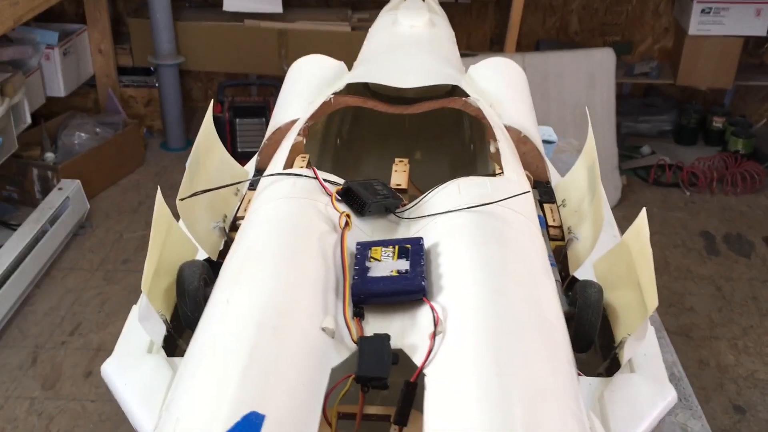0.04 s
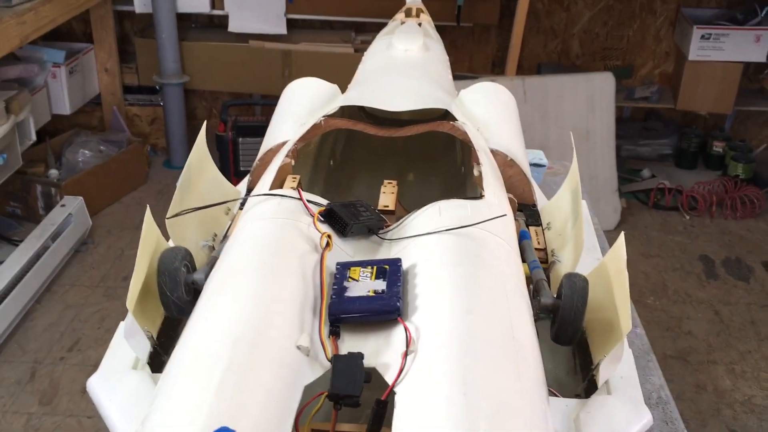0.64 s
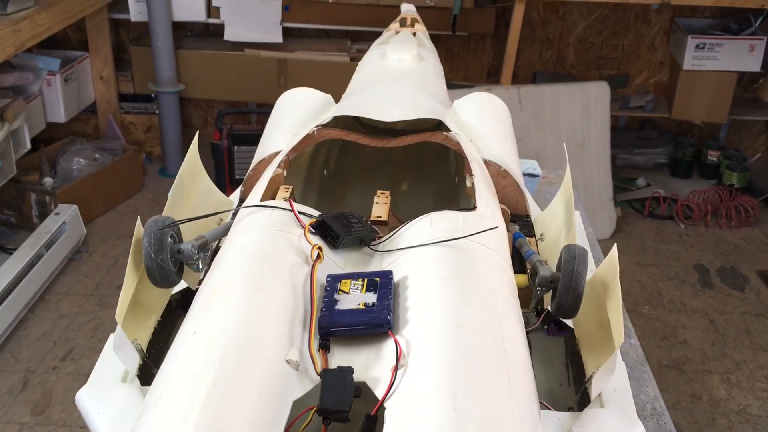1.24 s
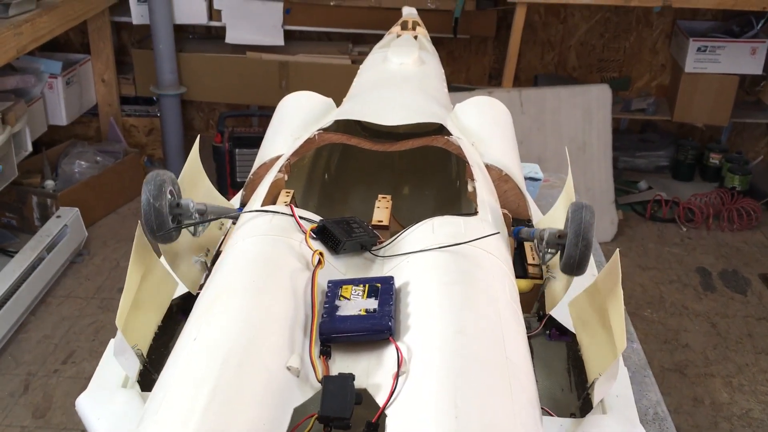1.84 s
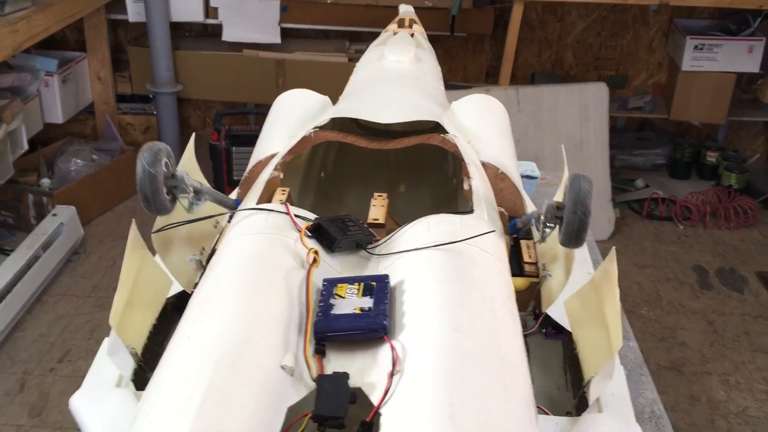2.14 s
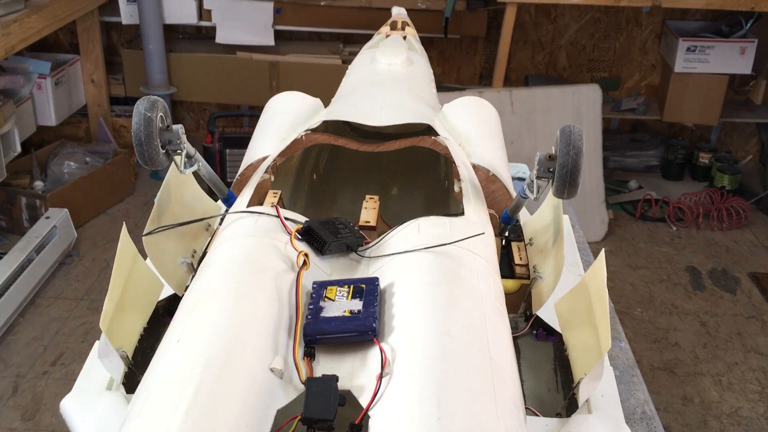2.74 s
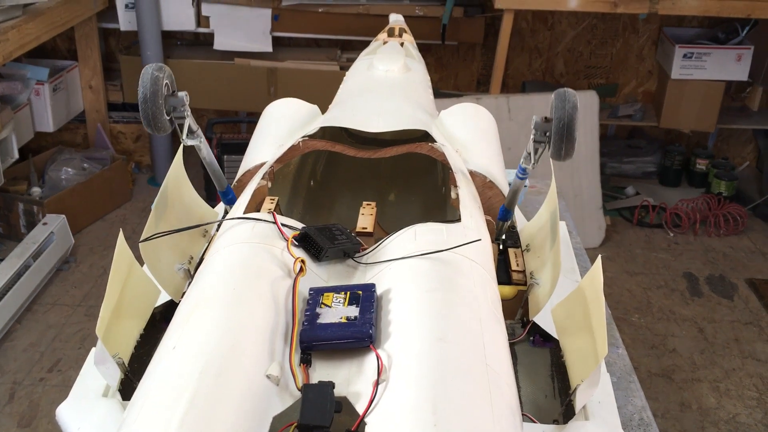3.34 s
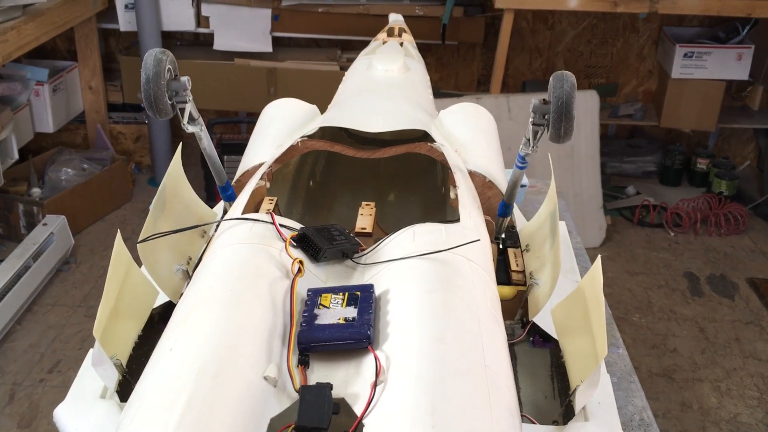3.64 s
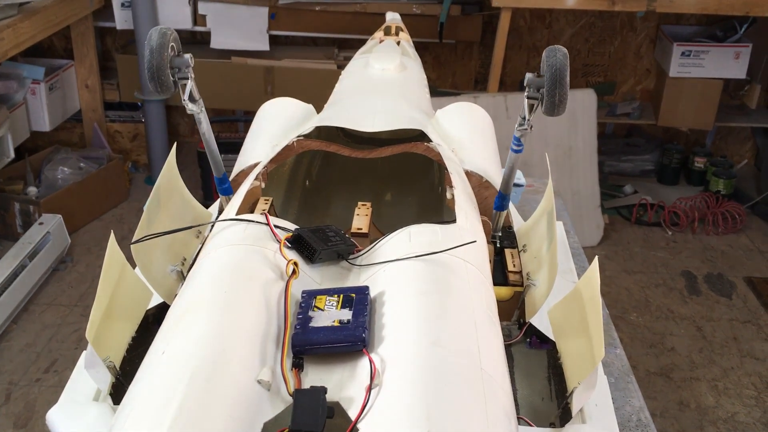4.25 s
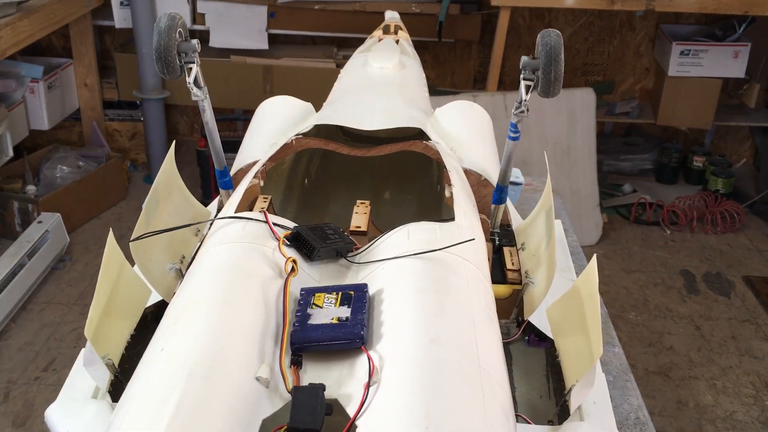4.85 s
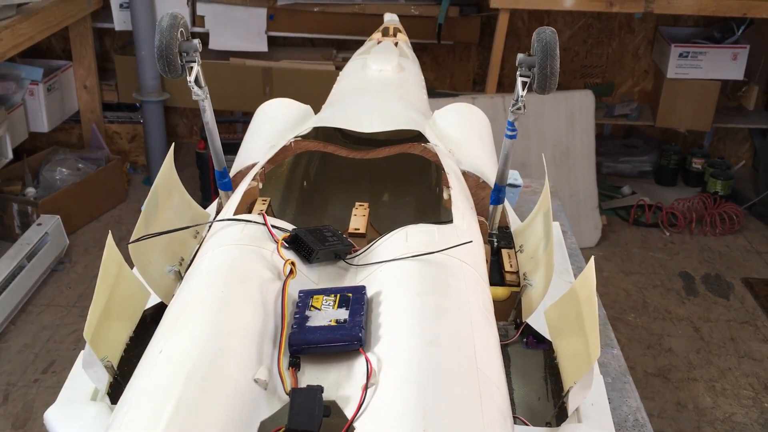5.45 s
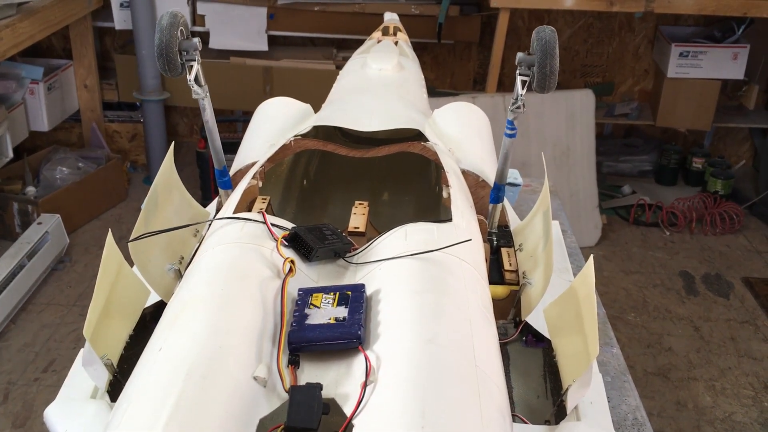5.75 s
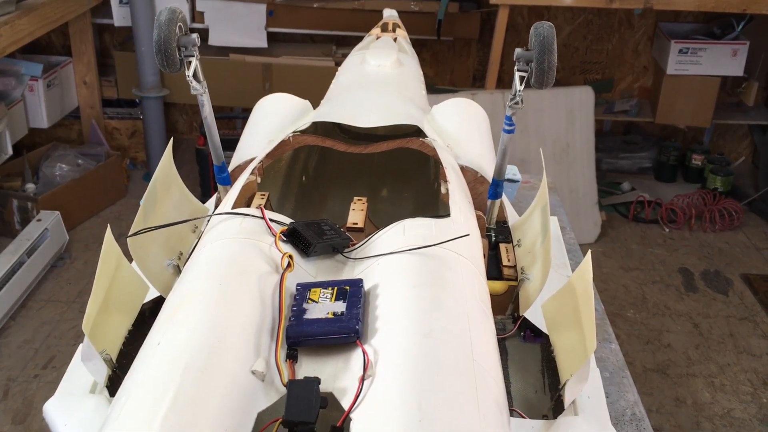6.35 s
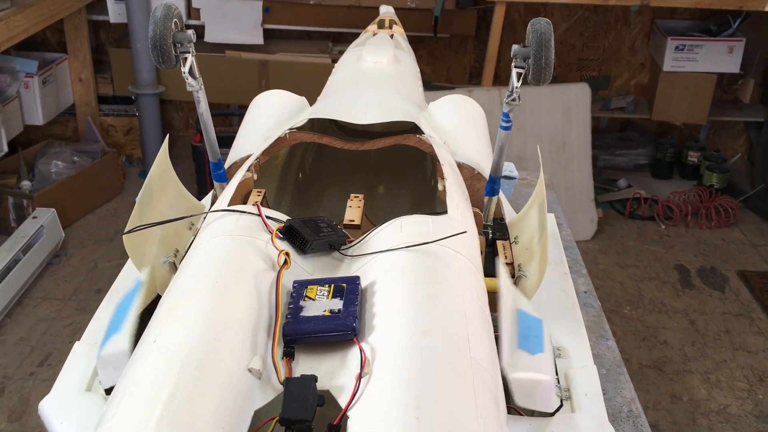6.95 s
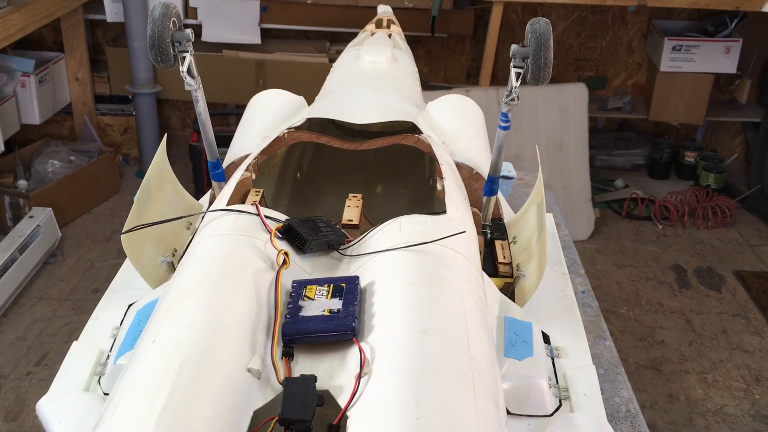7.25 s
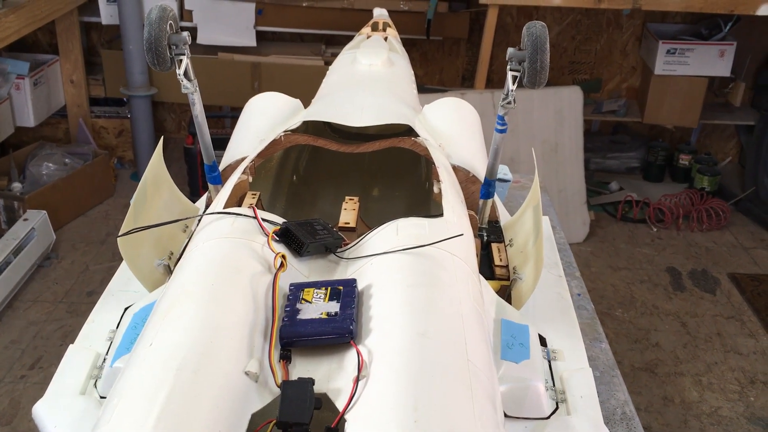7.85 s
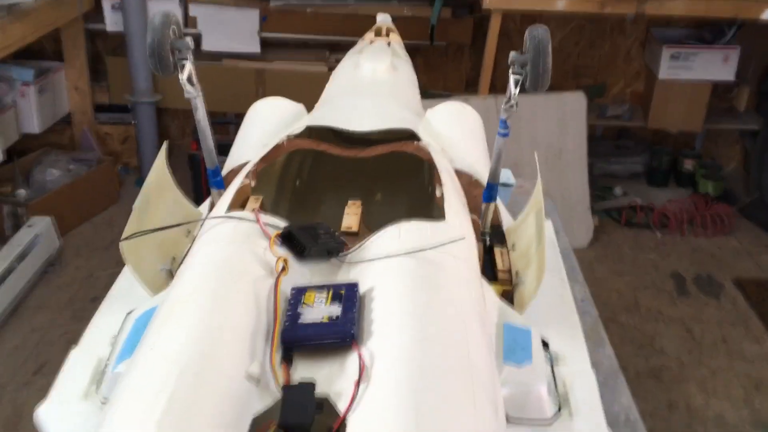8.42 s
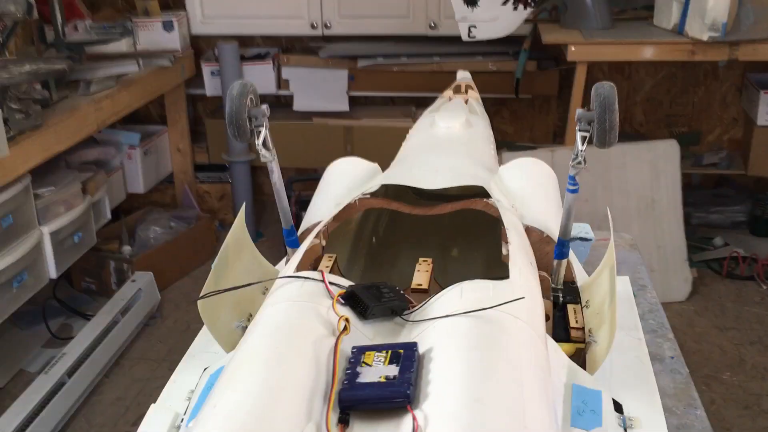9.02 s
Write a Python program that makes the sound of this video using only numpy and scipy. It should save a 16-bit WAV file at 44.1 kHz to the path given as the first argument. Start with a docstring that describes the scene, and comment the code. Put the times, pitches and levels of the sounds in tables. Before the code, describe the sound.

Two electric motors whine as a model jet's landing gear extends and clunks into place, then servos briefly whirr the doors shut.

```python
"""Over a low room drone, a hand bumps the camera as two electric motors crank out a model jet's landing
gear in a small workshop. They beat against each other, labour once per turn of their lead screws and
speed up as the legs rise. At 5.5 s the legs hit their stops and the airframe rings. From 6.7 s servos
whirr the gear doors shut, and just after 8 s the camera's lens ticks and rasps as it refocuses."""
import sys
import numpy as np
from scipy import signal
from scipy.fft import rfft, irfft
from scipy.io import wavfile

SR = 44100
rng = np.random.default_rng(int(sys.argv[2]) if len(sys.argv) > 2 else 0)


def materialize(psi):
    """Save the field psi as 16-bit PCM at rate SR to the path in sys.argv[1].

    A 1-D psi becomes a single channel; in a 2-D psi each row is a channel.
    """
    bounded = np.clip(np.atleast_2d(psi).T, -1, 1)
    quanta = np.round(bounded * 32767).astype(np.int16)
    wavfile.write(sys.argv[1], SR, quanta)


N = 400428
TIME = np.arange(N) / SR


def gain_of(db):
    return 10 ** (np.asarray(db) / 20)


def unit_rms(x):
    return x / np.sqrt(np.mean(x ** 2) + 1e-20)


def bell(x, centre, width):
    return np.exp(-((x - centre) / width) ** 2)


def curve(rows):
    """Linear interpolation of (time, value) rows at every sample."""
    return np.interp(TIME, *np.transpose(rows))


def spectrum_at(points, hz):
    """Interpolation on a logarithmic frequency axis."""
    f, value = np.transpose(points)
    return np.interp(np.log(hz + 1), np.log(f + 1), value)


def coloured(x, points):
    """Spectral shaping by (frequency [Hz], level [dB]) points; rms 1."""
    return unit_rms(irfft(rfft(x) * gain_of(spectrum_at(points, np.fft.rfftfreq(N, 1 / SR))), N))


def noise():
    return rng.standard_normal(N)


def wander(hz):
    """Random fluctuation: noise low-passed at hz; rms 1."""
    return unit_rms(irfft(rfft(noise()) / (1 + (np.fft.rfftfreq(N, 1 / SR) / hz) ** 4), N))


def gate(start, end, fade):
    """Envelope with a quick onset and exponential decay after the end."""
    return np.clip((TIME - start) / 0.0044, 0, 1) * np.exp(-np.maximum(TIME - end, 0) / fade)


def add(mix, s, sound):
    part = mix[round(s * SR):][:len(sound)]
    part += sound[:len(part)]


def order(angle, k):
    """Harmonic k of a shaft's rotation, at random phase; rms 1."""
    return np.sqrt(2) * np.sin(k * angle + 2 * np.pi * rng.random())


# Reverberation of the workshop: (frequency [Hz], T60 [s])
REVERB_TIMES = [(150, 0.9), (500, 0.38), (2000, 0.33), (5000, 0.27), (14000, 0.15)]

def workshop(x, wet_db):
    """Reverberation: dense reflections from shelves and walls share the power with the direct sound."""
    taps = rng.standard_normal(SR // 2) * (rng.random(SR // 2) < .1)
    taps[:130] = 0  # 3 ms before the first reflection
    hz, t, bands = signal.stft(taps, SR, nperseg=256)
    decay = gain_of(-60 * t / spectrum_at(REVERB_TIMES, hz)[:, None])
    tail = signal.istft(bands * decay, SR, nperseg=256)[1]
    wet = gain_of(wet_db)
    return (x + wet * signal.fftconvolve(x, tail / np.linalg.norm(tail))[:N]) / np.hypot(1, wet)


# Level of the low hum near 163 Hz, quieter under the motors, louder afterwards: (time [s], level [dB])
DRONE_LEVELS = [(0.2, -72), (0.82, -62), (1.65, -72), (2.05, -58), (2.27, -67), (3.33, -74.5), (5.4, -60.5),
                (5.47, -68.5), (6.36, -57), (6.51, -66), (7.15, -52), (7.45, -64.5), (8.04, -56),
                (9.05, -58.5)]
# Soft rustles: (time [s], half width [s], level [dB])
RUSTLE_EVENTS = [(6.042, 0.088, -66), (7.024, 0.18, -62)]
# Low rustle, also the lens's rumble: (frequency [Hz], spectral level [dB])
RUMBLE_SPECTRUM = [(20, -31.5), (50, -2), (100, -2.5), (280, -1), (450, -8.5), (900, -11.5), (2000, -25.5),
                   (6000, -55)]
# Steady room noise: (frequency [Hz], spectral level [dB])
ROOM_SPECTRUM = [(15, -41.5), (25, -7.5), (53, -3.5), (113, -10), (164, -6.5), (215, -15), (340, -17),
                 (433, -28.5), (1850, -34.5), (3830, -36.5), (4870, -40.5), (5730, -36), (7700, -39.5),
                 (13200, -34), (15500, -36.5)]

def background():
    """Modulation makes a drone waver; shaped noise gives rustle, a hand's bump and the room's floor."""
    phase = 2 * np.pi * 163.5 * TIME
    drone = unit_rms((5 + wander(5.9)) * np.cos(phase) + 1.6 * wander(7) * np.sin(phase))
    drone *= gain_of(curve(DRONE_LEVELS) - 1.1)
    rustle = gain_of(-75.5) + sum(gain_of(db) * bell(TIME, s, width) for s, width, db in RUSTLE_EVENTS)
    rustle *= coloured(noise(), RUMBLE_SPECTRUM)
    bump = coloured(noise(), [(20, -10), (55, 0), (170, -3.5), (400, -24.5), (2000, -66)])
    bump *= gain_of(-46.5) * gate(0, 0.052, fade=0.05)
    return drone + rustle + bump + gain_of(-64.5) * coloured(noise(), ROOM_SPECTRUM)


def shaft(hz, load, sag, screw_start, jitter):
    """Frequency modulation: drag slows the shaft once per screw turn. Returns angle [rad] and drag."""
    gear_ratio = 35.88
    drag = -np.cos(2 * np.pi * (np.cumsum(hz) / SR / gear_ratio - screw_start))
    hz = hz * (1 - sag * np.sqrt(load) * drag + jitter * (.5 + load) * wander(68.3))
    return 2 * np.pi * np.cumsum(hz) / SR, drag


# Standing-wave nulls in motor B's fundamental: (frequency [Hz], half width [Hz], gain [dB])
STANDING_WAVE_NULLS = [(309.4, 3, -12), (324.3, 1.5, -16)]
# Second shaft harmonic: (time [s], level [dB])
SECOND_HARMONIC = [(0.0, -44.5), (3.28, -32.5), (3.32, -35), (3.65, -36.5), (3.68, -28), (3.91, -31.5),
                   (4.32, -45.5), (4.36, -35), (4.66, -35), (4.67, -45.5), (5.01, -32), (5.15, -47.5),
                   (5.33, -28.5), (5.41, -45), (5.44, -29), (5.5, -46)]
# Third shaft harmonic: (time [s], level [dB])
THIRD_HARMONIC = [(0.0, -44), (0.46, -35), (2.1, -39.5), (3.03, -33.5), (3.08, -39), (3.57, -44.5),
                  (3.65, -33), (3.74, -39.5), (3.92, -32), (4.61, -37.5), (5.25, -29), (5.42, -43),
                  (5.45, -33), (5.5, -45)]

def motor_hum(a, b, speed_b, load, shake):
    """Beating: the lowest harmonics of two shafts, at angles a and b, interfere as their speeds differ."""
    nulls_db = sum(db * bell(speed_b, hz, width) for hz, width, db in STANDING_WAVE_NULLS)
    onset_db = -15 * np.exp(-TIME / 0.41)
    second, third = [gain_of(curve(levels) - 0.6 + 1.8 * wander(25) - 0.53 * load) * shake
                     for levels in (SECOND_HARMONIC, THIRD_HARMONIC)]
    hum = gain_of(-36.5 + onset_db + nulls_db) * order(b, 1)
    hum += gain_of(-48 - 7.6 * load) * (0.59 + wander(29)) * order(a, 1)
    hum += second * (order(a, 2) + 0.71 * load * order(b, 2))
    hum += third * (order(a, 3) + 0.38 * load * order(b, 3))
    return hum


# Gearbox harmonics: (shaft order, loaded level [dB], unloaded level [dB])
GEARBOX_HARMONICS = [(4, 1, 0), (5, -9, 2), (6, 1.5, 0), (7, -5.5, -9), (8, -7, -6), (9, -12, -7),
                     (10, -4.5, -4), (11, -7, -9), (12, -14, -9), (13, -19, -16), (14, -21, -16),
                     (15, -17, -14), (16, -21, -15), (19, -16, -11), (21, -15, -15), (22, -18, -14),
                     (24, -15, -11), (27, -18, -21), (30, -8.5, -12), (42, -11, -12), (48, -12.5, -17)]

def gearbox_buzz(a, b, load, shake):
    """Periodic forcing: the gears sound a harmonic series whose balance follows the load."""
    buzz = np.zeros(N)
    for k, heavy_db, light_db in GEARBOX_HARMONICS:
        level_db = light_db + load * (heavy_db - light_db) + 1.6 * np.sin(a / 17.4 + k)
        buzz += gain_of(level_db) * (order(a, k) + (0.35 + 0.081 * load) * order(b, k))
    return gain_of(-35 + 0.5 * load) * unit_rms(buzz * shake * (1 + .1 * wander(150)))


CASING_HZ, CASING_WIDTH_HZ, THROB_DB = 5600, 105, 4.2

def casing_ring(a, b, speed_b, load, drag):
    """Resonance: the casing lifts harmonics that pass its mode, and rings most where the screw runs easy."""
    lift_17, lift_18 = [gain_of(9 * bell(k * speed_b, CASING_HZ, CASING_WIDTH_HZ)) for k in (17, 18)]
    ring = (.35 + .3 * load) * order(a, 18)
    ring += (.6 + .45 * load ** .5) * lift_18 * order(b, 18)
    ring += (1 - .8 * load) * lift_17 ** .4 * order(b, 17)
    ring += 0.37 * order(a, 17) + 0.12 * order(b, 19)  # sidebands one order away
    level_db = -45.5 - 2 * (1 - load) ** 2 + 1.1 * np.sin(b / 5) + 0.67 * wander(120)
    return ring * gain_of(level_db - THROB_DB * drag * (1.35 - .85 * load))


# Motor B's tooth-mesh tone and its sidebands: (shaft order, level [dB])
MESH_TONES = [(34, -27), (35, -27.5), (36, 2), (37, -11), (38, -21), (43, -19.5)]

def gear_whine(b, speed_b, load, drag):
    """Amplitude modulation: load, backlash and casing resonances vary the tone of the meshing teeth."""
    mesh = unit_rms(sum(gain_of(db) * order(b, k) for k, db in MESH_TONES))
    resonance_db = 4.5 * bell(36 * speed_b, centre=10800, width=45)
    resonance_db += 4.5 * bell(18 * speed_b, CASING_HZ, CASING_WIDTH_HZ)  # the casing shakes the mesh
    chatter_db = 2 * wander(120) + 2 * np.sin(b / 12)
    backlash_db = 5 * (drag ** 2 - .5)  # two dips per screw turn, as the teeth change flanks
    # pressed teeth sing loudest where the screw drags, slack ones where it runs free
    throb_db = np.tanh((load - .65) / .07) * THROB_DB * drag
    return mesh * gain_of(-49 + 11.5 * load + resonance_db + chatter_db + backlash_db + throb_db)


# Brush and gear hiss under load: (frequency [Hz], spectral level [dB])
LOADED_HISS = [(60, -30), (230, -23.5), (430, -18.5), (580, -3), (760, -2.5), (1100, 4), (1700, 1),
               (2500, -1.5), (3500, 0.5), (4500, -1), (5500, -4), (6800, 1.5), (8000, -5.5), (9600, -1.5),
               (11500, -1.5), (13000, -1.5), (15500, -4)]
# The same hiss running light: (frequency [Hz], spectral level [dB])
UNLOADED_HISS = [(60, -30), (230, -14), (430, -16), (580, 3), (800, -8), (1100, -4.5), (1900, 0), (3400, 0),
                 (4500, -8.5), (5700, 3.5), (6800, 0), (8500, -2.5), (9900, -3), (11800, 8.5), (13000, -1),
                 (15500, 0.5)]

def brush_hiss(a, b, load, drag):
    """Friction noise: brushes scrape in step with the shafts, then hiss thinly as the motors coast."""
    chop = gain_of(3.2 * np.cos(a) + 1.3 * np.cos(b) + .8 * wander(40) + .5 * drag)
    hiss = np.sqrt(load) * coloured(noise() * chop, LOADED_HISS)
    hiss += np.sqrt(1 - load) * coloured(noise() * chop, UNLOADED_HISS)
    mid_swing_db = 3 * bell(TIME, centre=3.5, width=1)
    hiss *= gain_of(-36.5 + mid_swing_db) * gate(-1, 5.515, fade=0.037)
    coasting = coloured(noise(), [(11000, -30), (12700, 0), (13200, -3), (14500, -25)])
    return hiss + gain_of(-45) * coasting * gate(5.525, 5.56, fade=.025)


# Motor A, on the first leg: (time [s], shaft speed [Hz])
MOTOR_A_SPEED = [(0, 310), (.4, 307.2), (1.2, 305.7), (2.4, 304.9), (3, 309), (3.5, 311.3), (3.9, 316),
                 (4.5, 322.3), (5.1, 326.3), (5.3, 326.6), (5.45, 323)]
# Motor B, on the second, stiffer leg: (time [s], shaft speed [Hz])
MOTOR_B_SPEED = [(0, 304), (.3, 301), (.6, 299.4), (1.7, 297.6), (2.55, 299.8), (3.5, 311.6), (4, 316),
                 (4.5, 322), (5.1, 327.6), (5.45, 326.3)]
# Weight of the legs on the screws: (time [s], load [0-1])
SCREW_LOAD = [(0, 0.87), (1.7, 0.85), (2.5, 0.97), (3.2, 0.48), (4, 0.18), (5.4, 0.24)]

def retract_motors():
    """Rotating machinery: hum, gear tones and hiss all follow the angles of two loaded shafts."""
    load, speed_b = curve(SCREW_LOAD), curve(MOTOR_B_SPEED)
    a, _ = shaft(curve(MOTOR_A_SPEED), load, sag=0.0053, screw_start=0.375, jitter=0.002104)
    b, drag = shaft(speed_b, load, sag=.008, screw_start=.15, jitter=.0025)
    # gear wheels shake the hum and buzz at their own rates
    shake = 1 + 0.08 * wander(27) + 0.1 * np.sin(a / 8.7) + 0.082 * np.sin(a / 16)
    hum = motor_hum(a, b, speed_b, load, shake) * gate(-1, 5.5, fade=.042)
    tones = gearbox_buzz(a, b, load, shake)
    tones += casing_ring(a, b, speed_b, load, drag)
    tones += gear_whine(b, speed_b, load, drag)
    tones *= gate(-1, 5.465, fade=.025)
    hiss = brush_hiss(a, b, load, drag)
    return workshop(tones, wet_db=-6) + workshop(hum, wet_db=-15) + workshop(hiss, wet_db=-3)


# Two legs strike their stops, then the doors jerk into motion: (time [s], level [dB])
IMPACTS = [(5.462, -23.5), (5.512, -23.5), (6.681, -41)]
# Modes of the airframe: (frequency [Hz], level [dB], T60 [s])
AIRFRAME_MODES = [(265, -8, .14), (345, -6, .14), (570, -5, .1), (690, -4, .1), (860, -3, .08),
                  (1080, -2, .07), (1240, 0, .07), (1420, -2, .07), (1750, -3, .06), (2050, -6, .06)]

def end_stops():
    """Impact excitation: each blow crunches the gears and sets the airframe's damped modes ringing."""
    t, out = np.arange(SR // 3) / SR, np.zeros(N)
    crunch_spectrum = [(60, -45), (170, -29), (280, 6), (450, -9), (700, 9), (1400, 8), (2200, 1),
                       (4000, -14), (6500, -3.5), (15000, -23)]
    for s, db in IMPACTS:
        ring = sum(gain_of(level - 60 * t / t60) * np.sin(2 * np.pi * (hz * t + rng.random()))
                   for hz, level, t60 in AIRFRAME_MODES)
        crunch = coloured(noise(), crunch_spectrum)[:len(t)] * np.exp(-t / 0.017)
        add(out, s, gain_of(db) * (0.29 * ring + 0.42 * crunch))
    return workshop(out, wet_db=-4.5)


# Servo gears in their cases: (frequency [Hz], spectral level [dB])
SERVO_SPECTRUM = [(120, -37), (270, -5.5), (440, -26), (680, -7.5), (950, -10), (1400, -18.5),
                  (2100, -14.5), (3000, -16), (3300, -5), (3500, -9), (3900, 0.5), (4400, -8), (5000, -9.5),
                  (5800, -9), (7000, -13), (8700, -9.5), (10500, -19), (12000, -14), (15500, -14)]
# Rasp of the moving doors: (frequency [Hz], spectral level [dB])
DOOR_SPECTRUM = [(120, -46), (200, -18), (258, 3), (407, -33), (690, -17), (1740, -12), (1980, -5),
                 (3480, -4.5), (3890, 3), (5010, -10), (5800, -2), (6470, -10), (15500, -4)]

def door_servos():
    """Modulated noise: the servos sizzle while they wait, then their gears rattle and the doors rasp."""
    start_s, stop_s = 6.657, 7.16
    rattle = gain_of(2 * wander(110) + 1.9 * wander(900))
    strain_db = 2.5 * np.exp(np.minimum(TIME - stop_s, 0) / 0.068)  # rises just before the doors seat
    spin_up = np.clip((TIME - start_s) / 0.01, 0, 1)
    gears = coloured(noise() * rattle, SERVO_SPECTRUM)
    gears *= gain_of(-41.5 + strain_db) * spin_up * gate(start_s, stop_s, fade=0.014)
    rasp = coloured(noise() * rattle, DOOR_SPECTRUM)
    rasp *= gain_of(-42 + 6.5 * bell(TIME, centre=7.005, width=.06)) * gate(6.925, stop_s, fade=0.012)
    sizzle_spectrum = [(2800, -46), (3300, -3), (3550, -21.5), (3900, -3), (4500, -9), (5500, -22)]
    sizzle = coloured(noise(), sizzle_spectrum)
    sizzle *= gain_of(-83 + 3.7 * wander(13.7)) * gate(5.6, start_s, fade=.02)
    return workshop(gears + rasp + sizzle, wet_db=-9)


# Jolts of the lens against its stop: (time [s], level [dB], decay time [s])
FOCUS_KNOCKS = [(8.151, -49, .003), (8.179, -33.5, 0.01), (8.492, -25.5, 0.0029), (8.5189, -24, 0.0026),
                (8.548, -25, 0.0032)]
# Ticks as the lens starts and settles: (time [s], level [dB])
FOCUS_TICKS = [(8.1495, -52), (8.1788, -45), (8.4565, -48), (8.4885, -40), (8.5136, -44), (8.542, -50),
               (8.597, -64)]

def lens_clicks():
    """Dispersion: amid small ticks, each knock crosses the camera case treble first, as a falling chirp."""
    t, out = np.arange(SR // 12) / SR, np.zeros(N)
    scrape_spectrum = [(300, -12), (900, 12), (1800, -8), (2800, -1), (4500, -15),
                       (7000, -6), (15000, -8)]
    for s, db, decay in FOCUS_KNOCKS:
        attack = 1 - np.exp(-t / 0.00093)
        fade = np.exp(-t / decay) + 0.13 * np.exp(-t / (3 * decay))
        chirp = np.sin(2 * np.pi * 0.82 * np.log1p(t / 0.0002)) * attack * fade
        scrape = coloured(noise(), scrape_spectrum)[:len(t)]
        scrape *= 0.17 * np.exp(-t / 0.0047) + 0.23 * np.exp(-t / 0.00026)
        add(out, s, gain_of(db) * (chirp + scrape))
    for s, db in FOCUS_TICKS:
        add(out, s, gain_of(db) * rng.standard_normal(len(t)) * np.exp(-t / 0.0014))
    return out


# Rasp of the sliding lens: (frequency [Hz], spectral level [dB])
SLIDE_SPECTRUM = [(180, -35), (300, -2), (476, -2), (543, -5), (953, -5.5), (2070, -13), (2980, -2.5),
                  (4650, -6), (5480, 0.5), (10500, -2), (15500, -0.5)]

def lens_slide():
    """Sliding friction: the lens rasps as it travels fast, then creeps to rest with a low rumble."""
    start_s, slows_s, rest_s = 8.177, 8.29, 8.467
    onset_db = -1.5 * np.clip(1 - (TIME - start_s) / .05, 0, 1)
    travel = gain_of(-44.5 + onset_db) * gate(start_s, slows_s, fade=0.026)
    creep = gain_of(-56) * gate(start_s, rest_s, fade=0.0034)
    rasp = coloured(noise() * gain_of(1.4 * wander(400)), SLIDE_SPECTRUM)
    rumble = gain_of(-55) * gate(slows_s, rest_s, fade=0.08) * coloured(noise(), RUMBLE_SPECTRUM)
    return np.hypot(travel, creep) * rasp + rumble


def scene():
    """Superposition: all sources add at one point, the same in both channels."""
    mono = retract_motors() + end_stops() + door_servos() + lens_clicks() + lens_slide() + background()
    return np.array([mono, mono])


def record(dry):
    """Band limiting: a steep linear-phase low-pass removes the highest treble."""
    low_pass = signal.firwin(1023, cutoff=15740, window=("kaiser", 9), fs=SR)
    return signal.oaconvolve(dry, low_pass[None], "same")


dry = scene()
out = record(dry)
materialize(out)
```